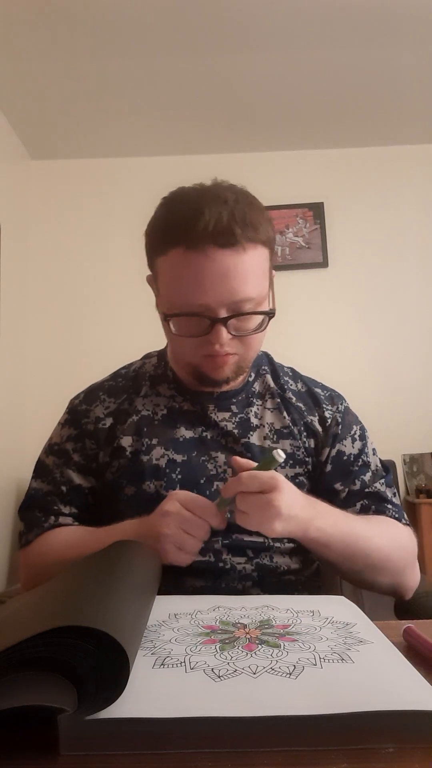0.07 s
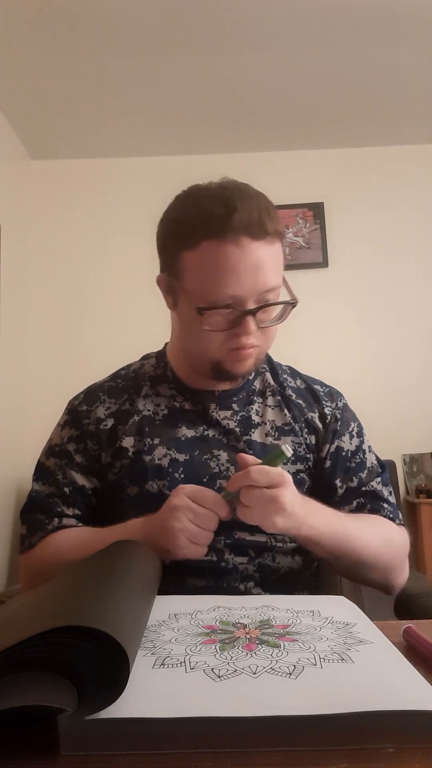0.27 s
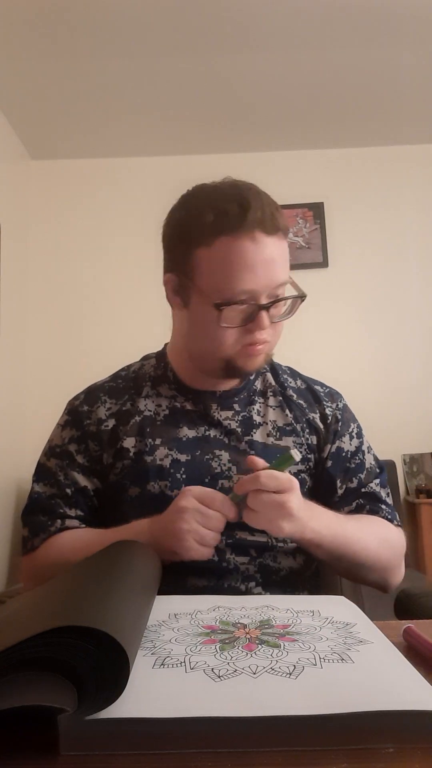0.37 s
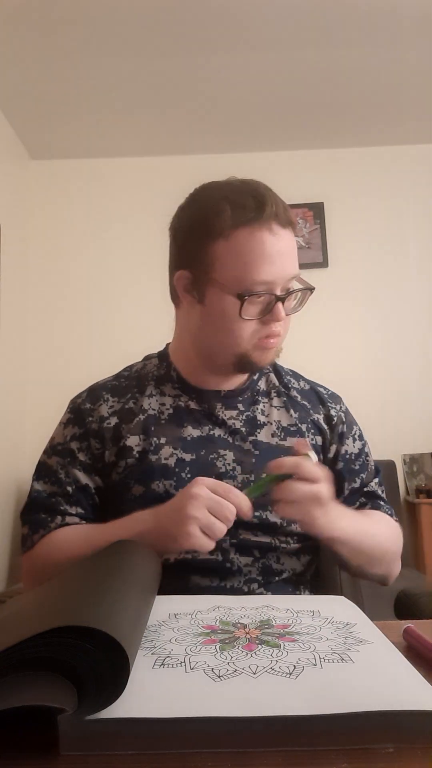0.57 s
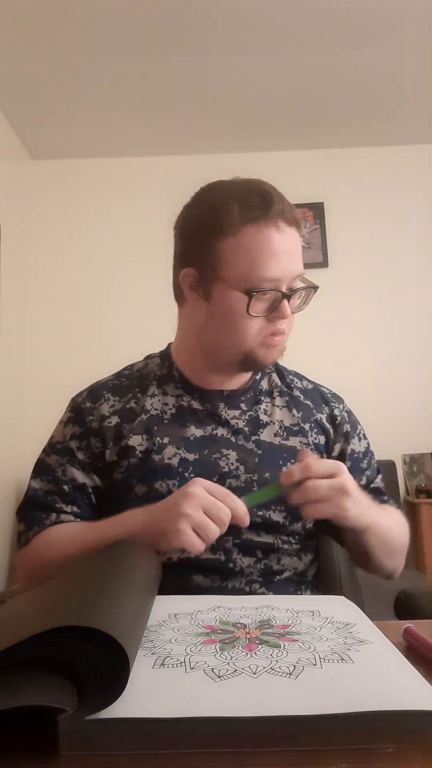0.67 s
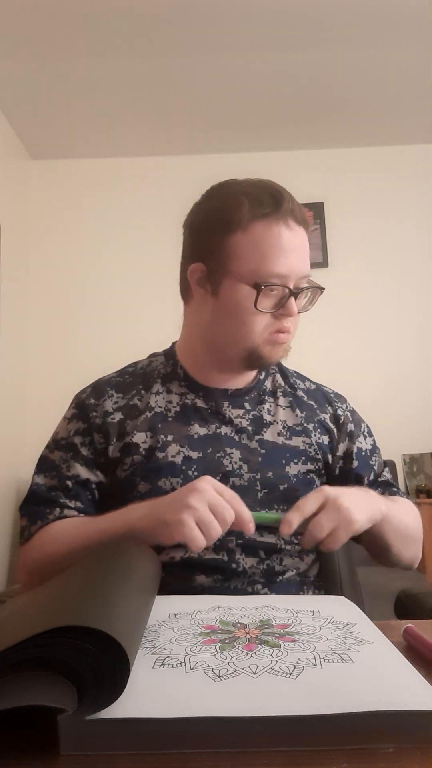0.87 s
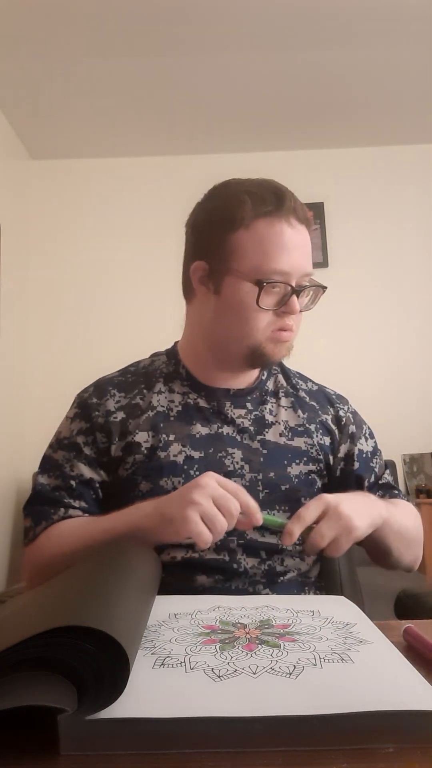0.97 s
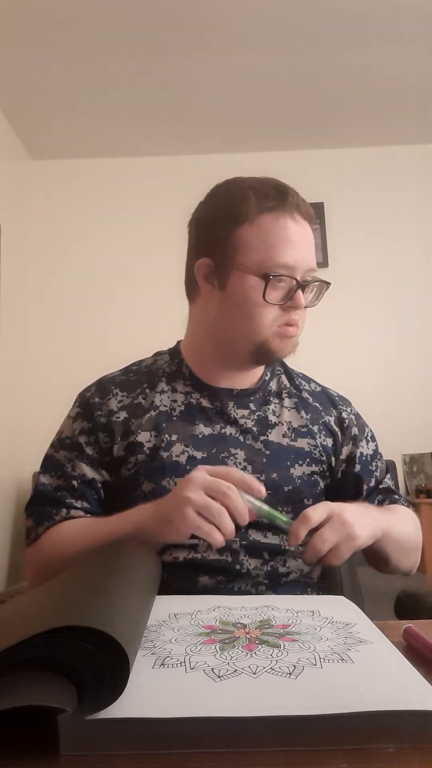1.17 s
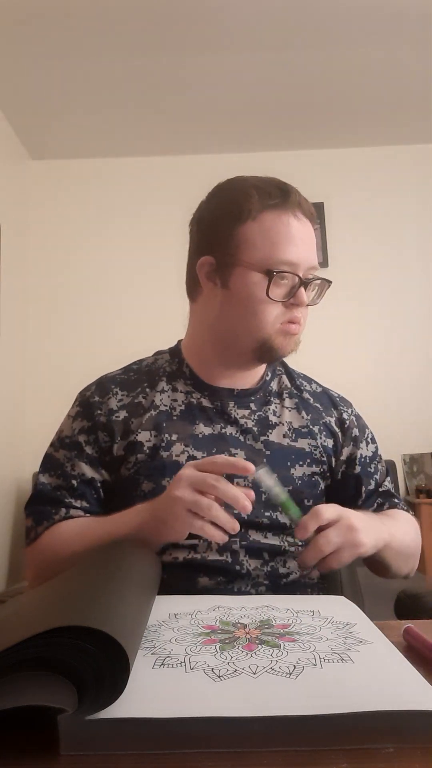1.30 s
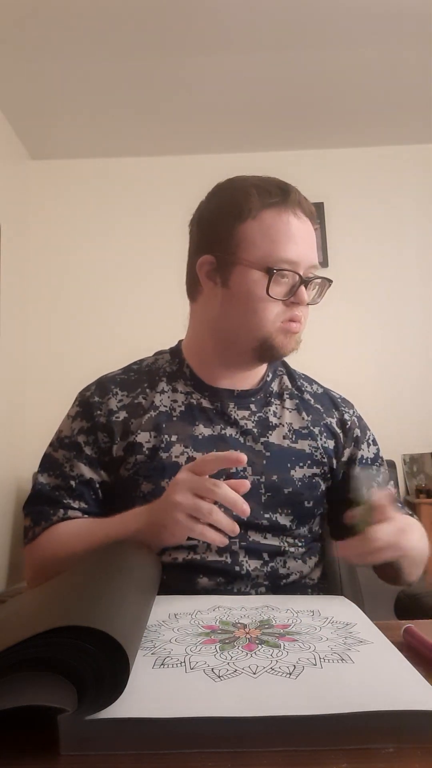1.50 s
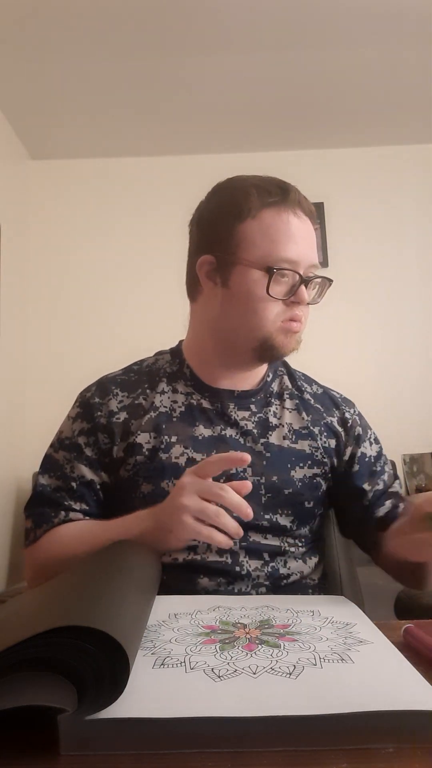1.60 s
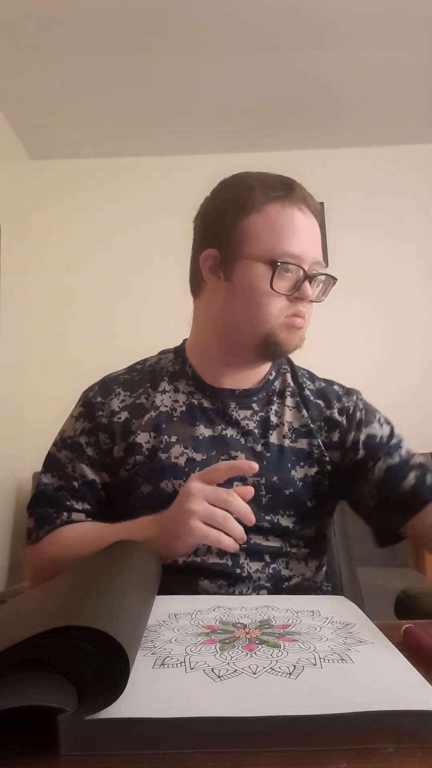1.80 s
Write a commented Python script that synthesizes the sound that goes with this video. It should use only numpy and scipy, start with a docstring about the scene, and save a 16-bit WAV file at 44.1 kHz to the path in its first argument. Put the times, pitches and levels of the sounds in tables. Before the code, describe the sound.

A plastic marker cap scrapes briefly along the barrel, ticks lightly and snaps shut with one loud, sharp click at about 0.25 seconds, echoing briefly in a small room. A faint tick and finger slide follow near 0.6 seconds. From about 1.3 to 1.8 seconds a sleeve and fingers rustle very softly. A fan hums low throughout.

```python
"""A plastic marker cap is pushed home in a small, bare room: it scrapes along the barrel, ticks twice on
the locking ridge and snaps shut. Each contact is a sharp crack that rings the cap; the walls answer.
Afterwards fingers slide on the marker and a sleeve rustles, both as grainy friction noise.
A fan hums throughout, low tones over rushing air; now and then a low tone swells."""
import sys
import numpy as np
from scipy import signal
from scipy.fft import rfft, irfft, next_fast_len
from scipy.io import wavfile
from scipy.ndimage import map_coordinates

SR = 44100
rng = np.random.default_rng(int(sys.argv[2]) if len(sys.argv) > 2 else 0)


def unload_wav(signal):
    """Save mono or channel-first audio to the path in sys.argv[1] as 16-bit WAV at rate SR, clipped to [-1, 1]."""
    wavfile.write(
        sys.argv[1],
        SR,
        np.round(np.clip(np.atleast_2d(signal).T, -1, 1) * 32767).astype(np.int16),
    )


N = 81585
TOP_HZ = 15750  # band limit


def amp(db):
    """dB to gain."""
    return 10 ** (np.asarray(db) / 20)


def unit(x):
    """Scale to rms 1."""
    return x / np.sqrt(np.mean(x ** 2) + 1e-20)


def along(points, hz):
    """Interpolate (f/Hz, value) points on a log axis."""
    f, v = np.transpose(points)
    return np.interp(np.log(hz + 1), np.log(f + 1), v)


def pan(db):
    """Stereo gains for an L-R level difference."""
    return amp(np.array([[.5], [-.5]]) * db)


def wobble(rate_hz):
    """Smooth random curve, rate_hz knots a second."""
    knots = rng.standard_normal(N // 10)
    return map_coordinates(knots, [np.arange(N) * rate_hz / SR + 2], mode="wrap")


def impulse(at_s):
    """Band-limited unit push."""
    offset = np.arange(N) - at_s * SR
    return np.sinc(offset) * np.exp(-(offset / 10) ** 2)


def filtered(x, response):
    """Apply a frequency response."""
    size = next_fast_len(N + SR // 2)
    hz = np.fft.rfftfreq(size, 1 / SR)
    return irfft(rfft(x, size) * response(hz), size)[..., :N]


def causal(x, db_of_hz):
    """Minimum-phase filter: rings only after its cause."""
    def response(hz):
        cepstrum = irfft(np.log(amp(db_of_hz(hz))))
        lag = np.arange(len(cepstrum))
        fold = 1 + np.sign(len(lag) // 2 - lag) * (lag > 0)
        return np.exp(rfft(cepstrum * fold))
    return filtered(x, response)


def noise(spectrum):
    """Two independent shaped noises, rms 1."""
    return unit(filtered(rng.standard_normal((2, N)), lambda hz: amp(along(spectrum, hz))))


def room(x):
    """Diffuse wall reflections: fast build-up, longest decay in the mids."""
    decay = [(300, 0.17), (1200, .52), (3000, 0.43), (6000, .45), (8000, .41), (12000, .36), (16000, .3)]  # f/Hz, T60/s
    colour = [(300, -2), (1200, 1), (3000, 0.5), (5000, 1), (7400, -1), (9200, -0.5), (12500, 1),
              (16000, 1)]  # f/Hz, gain/dB
    balance = [(300, 0), (1200, 1), (3500, 7.5), (6000, 2.5), (8000, 0), (13000, -.5)]  # f/Hz, L-R/dB
    build_s = .006
    bins_hz, t, spectra = signal.stft(rng.standard_normal((2, SR)), SR, nperseg=256)
    fade = np.exp(-np.log(1000) * t / along(decay, bins_hz)[:, None])
    tail = signal.istft(spectra * fade, SR, nperseg=256)[1]
    tail *= 1 - np.exp(-np.arange(tail.shape[1]) / SR / build_s)
    wet = signal.fftconvolve(x, tail / np.linalg.norm(tail[0]), axes=1)[:, :N]
    return filtered(wet, lambda hz: amp(along(colour, hz)) * pan(along(balance, hz)))


def fan():
    """Unsteady low tones over the rush of moving air."""
    tones = [(179.8, -66.5, 6), (249.7, -51, 5.3), (284.1, -59.5, 8.5), (310.9, -58, 8.6),
             (333.6, -60, 6.8), (390.3, -62.5, 20), (858, -67, 10), (891.6, -68.5, 10)]  # f/Hz, level/dB, width/Hz
    air_spectrum = [(25, -24), (42, -14.5), (62, 2.5), (85, -2), (140, 2), (205, -2.5), (270, 9.5),
                    (340, 6.5), (430, 0.5), (530, 2), (680, -8), (920, 0), (1100, -6), (1400, -15.5),
                    (2600, -20.5), (3400, -30), (5200, -32), (7000, -22.5), (9200, -38), (12500, -32),
                    (16000, -35.5)]  # f/Hz, density/dB
    air_correlation = [(60, 0.18), (150, 0.76), (320, .9), (550, .4), (1000, 0), (3000, .1), (12000, 0)]  # f/Hz, L-R correlation
    balance = [(60, 1.5), (300, 0), (600, 0), (1100, 3.5), (2300, 11.5), (4000, 14), (7000, 0.5),
               (12000, -3)]  # f/Hz, L-R/dB
    air_db, waver_db, tone_side_db = -51, 1.33, -19
    t = np.arange(N) / SR

    def tone(hz, width_hz):
        flutter = amp(2 * wobble(width_hz))
        return unit(flutter * np.sin(2 * np.pi * (hz * t + rng.random()) + wobble(width_hz)))

    def mid_side(hz):
        angle = np.arccos(np.clip(along(air_correlation, hz), -1, 1)) / 2
        return np.array([np.cos(angle), np.sin(angle)])

    side_gain = amp(tone_side_db) * np.array([[1], [-1]])
    hum = sum(amp(db) * (tone(hz, width) + side_gain * tone(hz, width)) for hz, db, width in tones)
    mid, side = filtered(noise(air_spectrum), mid_side)
    air = amp(air_db + waver_db * wobble(rate_hz=5.9)) * np.array([mid + side, mid - side])
    return filtered(hum + air, lambda hz: pan(along(balance, hz)))


def hum_swells():
    """Single low tones rise and fall briefly in the hum."""
    swells = [(0.048, 0.062, 387.3, -50.5), (0.17, 0.087, 300, -48), (0.362, 0.24, 314, -48),
              (0.388, 0.18, 184, -52.5), (.59, .2, 62, -59.5), (1.081, 0.049, 312, -42),
              (1.146, 0.063, 310, -46.5), (1.47, 0.071, 326, -41.5), (1.733, 0.12, 175, -58)]  # centre t/s, length/s, f/Hz, level/dB
    t = np.arange(N) / SR
    hum = np.zeros(N)
    for centre_s, length_s, hz, db in swells:
        bell = np.cos(np.pi * np.clip((t - centre_s) / length_s, -.5, .5)) ** 2
        hum += amp(db) * np.sqrt(2) * bell * np.sin(2 * np.pi * hz * t + wobble(rate_hz=16))
    return hum


def rubbing(strokes, spectrum):
    """Friction: tiny catches roughen a noise that swells with each stroke; direct plus room."""
    grain_hz, grain_db, left_db = 320, 3.5, 2.5
    t = np.arange(N) / SR
    effort = sum(amp(db) * np.sin(np.pi * np.clip((t - start_s) / length_s, 0, 1))
                 for start_s, length_s, db in strokes)
    rub = effort * unit(noise(spectrum) * amp(grain_db * wobble(grain_hz)))
    return pan(left_db) * rub + room(rub)


def sleeve_rustle():
    """Cloth rubs softly."""
    strokes = [(1.25, 0.45, -65.5)]  # t/s, length/s, level/dB
    spectrum = [(800, 4), (2500, -7), (5000, -4), (7000, 6), (9200, -11.5), (12500, -1.5), (16000, -17)]  # f/Hz, density/dB
    return rubbing(strokes, spectrum)


def finger_slides():
    """Skin slides on the marker with a thin hiss."""
    strokes = [(.555, .075, -55), (.82, .14, -75), (1.41, .1, -65), (1.72, .12, -74)]  # t/s, length/s, level/dB
    spectrum = [(1000, -21), (4500, -11), (7200, 3), (9200, -14), (12500, 7), (14500, 3.5), (16000, 4)]  # f/Hz, density/dB
    return rubbing(strokes, spectrum)


def cap_scrape():
    """The cap rubs along the barrel."""
    strokes = [(-.06, 0.091, -45)]  # t/s, length/s, level/dB
    spectrum = [(500, -7.5), (1300, -9), (1900, 5), (2450, -3.5), (2700, 7.5), (2950, -4.5), (3400, -12.5),
                (5000, -12), (7200, -2.5), (9000, -17.5), (12500, -13.5), (16000, -22)]  # f/Hz, density/dB
    return rubbing(strokes, spectrum)


def contact(at_s, db, tilt_db_oct, low_db, top_db):
    """One crack disperses along the barrel and rings the cap for a few milliseconds."""
    cap_modes = [(1200, 300, 5), (2300, 430, 1), (3300, 600, 2.5), (7280, 1100, 6), (12850, 1700, 5.5)]  # f/Hz, width/Hz, lift/dB
    crack_spectrum = [(150, -29), (450, -5.5), (700, -17), (1200, -17.5), (2000, -13), (4000, -11.5),
                      (5000, -7.5), (6400, -5), (8100, -7.5), (9200, -16), (10500, -12), (12000, -8.5),
                      (14000, -14), (15200, -16.5), (16000, -22)]  # f/Hz, level/dB
    pivot_hz, bass_lag_s = 7000, .0004

    def colour_db(hz):
        rings = [1 / (1 + (2 * (hz - centre) / width) ** 2) for centre, width, _ in cap_modes]
        body = along(crack_spectrum, hz) + sum(ring * mode[2] for ring, mode in zip(rings, cap_modes))
        touch = low_db * (rings[0] + rings[1]) + top_db * rings[-1]
        tilt = tilt_db_oct * np.log2(np.maximum(hz, cap_modes[0][0]) / pivot_hz)
        return db + body + touch + tilt

    def dispersion(hz):
        return np.exp(-2j * np.pi * bass_lag_s * hz * (1 - hz / TOP_HZ / 2))

    return causal(filtered(impulse(at_s), dispersion), colour_db)


def cap_clicks():
    """The cap strikes, then seats; hands and table scatter each click before the walls answer."""
    # t/s, gain/dB, tilt/(dB/oct), lift of two low modes/dB, lift of top mode/dB, L-R/dB
    contacts = [(0.039, -22.5, -3.5, 5.5, 1, 3), (0.124, -33.5, -4, -0.5, -1, 9),
                (0.1638, -15.5, -4, 10, 1.5, 6.5), (0.171, -14, 3.5, 3, 8, 3),
                (0.2473, 16, 1.5, -1, -4, 0.5), (0.5572, -24, 2, 2, -3, 3)]
    direct_left = [(300, 3), (1200, 4), (3500, 5), (5500, 0.5), (7200, -0.5), (8800, -10), (11000, 2.5),
                   (13000, -4.5)]  # f/Hz, gain/dB
    direct_right = [(300, -8), (1200, -8), (3500, -8), (5500, -1), (7200, 7.5), (8500, 5), (11000, 2.5),
                    (13000, 7)]  # f/Hz, gain/dB
    strike_gain, seat_gain, seat_s = .72, .25, .00096
    scatter_gain, scatter_t60_s = .69, .017
    clicks = [contact(*row[:-1]) for row in contacts]
    panned = sum(click * pan(row[-1]) for click, row in zip(clicks, contacts))
    t = np.arange(SR // 20) / SR
    envelope = np.exp(-np.log(1000) * t / scatter_t60_s) * (1 - np.exp(-t / seat_s))
    scatter = unit(rng.standard_normal((2, len(t))) * envelope) / np.sqrt(len(t))
    path = strike_gain * (t == 0) + seat_gain * impulse(seat_s)[:len(t)] + scatter_gain * scatter
    near = signal.fftconvolve(panned, path, axes=1)[:, :N]
    left = causal(near[0], lambda hz: along(direct_left, hz))
    right = causal(near[1], lambda hz: along(direct_right, hz))
    return np.array([left, right]) + room(sum(clicks)[None])


def scene():
    """Cap, fingers and sleeve over the fan."""
    friction = cap_scrape() + finger_slides() + sleeve_rustle()
    return friction + cap_clicks() + fan() + hum_swells()


def record(dry):
    """Clip at full scale, then low-pass steeply."""
    return filtered(np.clip(dry, -1, 1), lambda hz: 1 / (1 + (hz / TOP_HZ) ** 200))


dry = scene()
out = record(dry)
unload_wav(out)
```